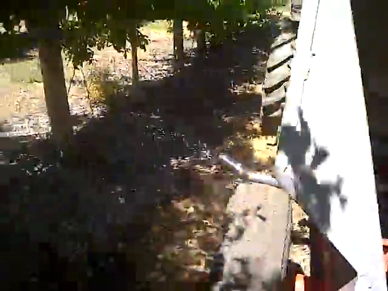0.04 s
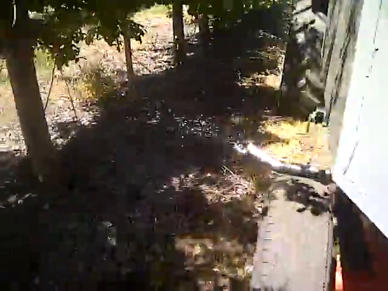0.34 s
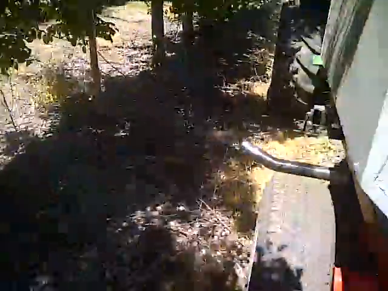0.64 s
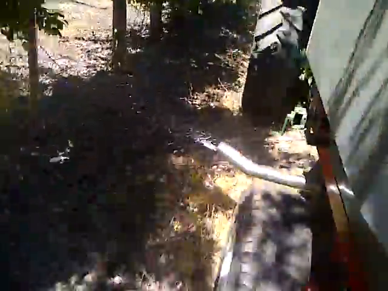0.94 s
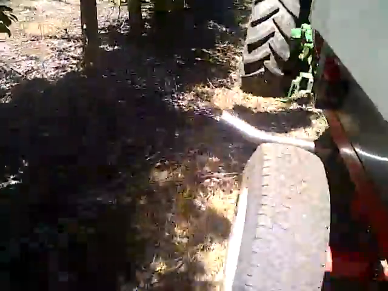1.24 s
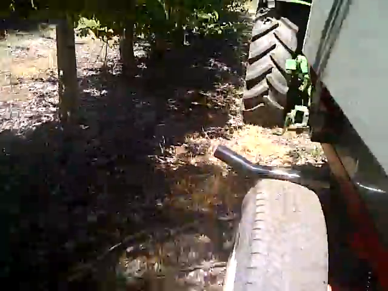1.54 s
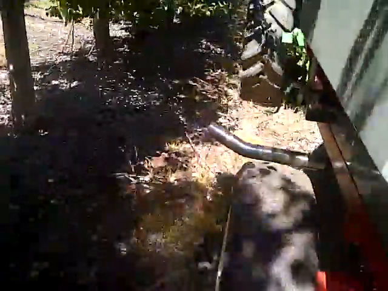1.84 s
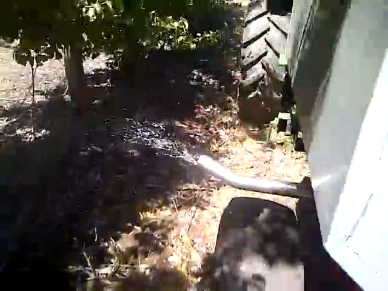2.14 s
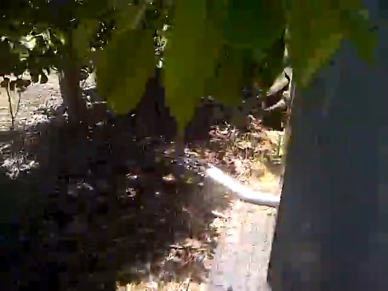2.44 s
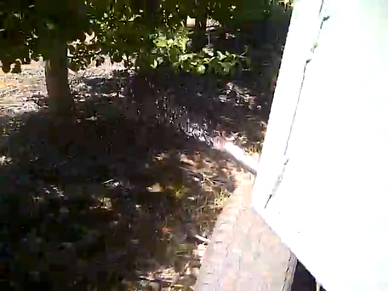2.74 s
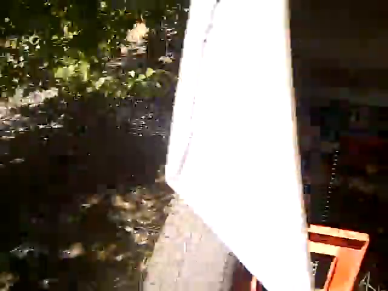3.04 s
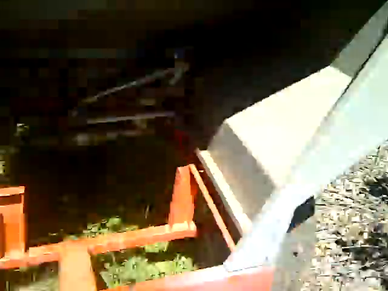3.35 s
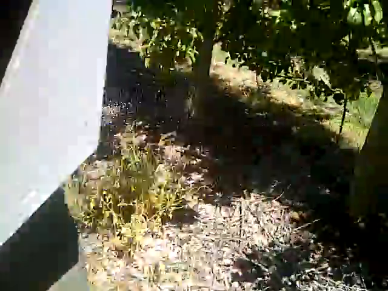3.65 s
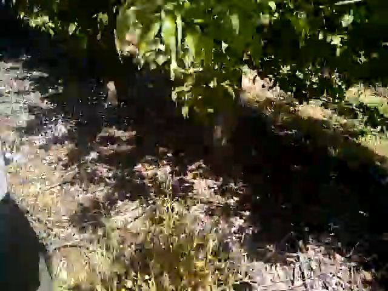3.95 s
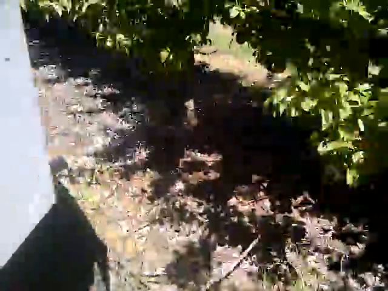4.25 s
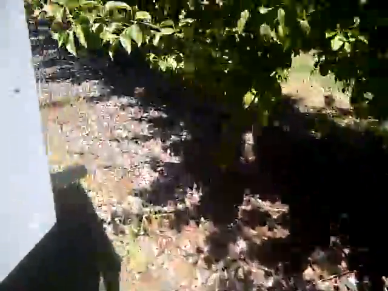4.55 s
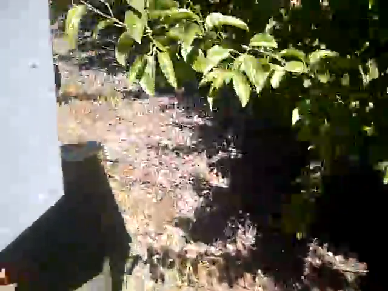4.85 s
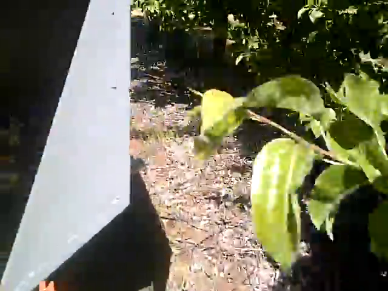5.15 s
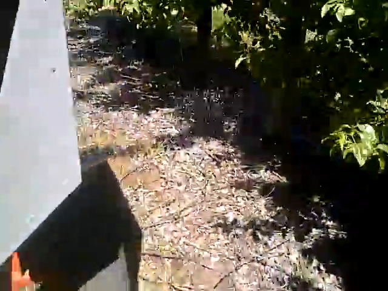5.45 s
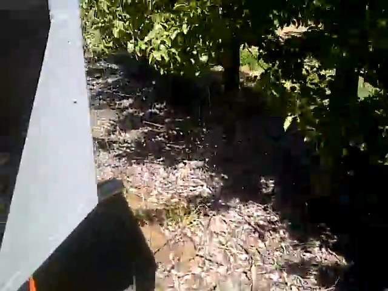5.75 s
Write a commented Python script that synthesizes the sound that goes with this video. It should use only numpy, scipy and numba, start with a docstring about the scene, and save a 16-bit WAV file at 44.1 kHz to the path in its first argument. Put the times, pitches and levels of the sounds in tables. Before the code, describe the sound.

A spreader's blower roars steadily from the start, close and outdoors, with a wavering fan hum and a lower, quieter tractor engine drone. Over it, fertilizer granules hiss through a metal pipe in fast pulses, with irregular heavier rattles and bright clinks from hard lumps, notably around 0.3, 1, 1.5 and 2.4 seconds. The hopper gives a brief dull knock at about 1.2 seconds. At 2.6 seconds a leaf brushes and slaps the microphone with a loud, short crackle, and the whole sound suddenly drops very low. It stays down until about 3 seconds, then creeps back to full level by roughly 4.5 seconds, the rattling continuing throughout. Another knock comes near 4.7 seconds. Short booming gusts sound in the air duct around 4.6, 4.8 and 5.5 seconds, and the hum grows slightly stronger as the machine runs on to 6 seconds.

```python
"""A blower roars and fertilizer granules hiss through a metal pipe, heard from a spreader in an orchard.
Underneath, the tractor engine drones, the fan hums, gusts boom in the duct and jolts knock the hopper.
Each turn of the feed shaft throws a batch of granules that rattles the pipe. Some batches are much
heavier, and hard lumps make the pipe clink. A leaf brushes and then slaps the microphone, so the
automatic volume control turns everything down, waits, then creeps back up."""
import sys
import numpy as np
from scipy import signal
from scipy.fft import rfft, irfft, next_fast_len
from scipy.io import wavfile
from scipy.ndimage import map_coordinates
from numba import njit

SR = 44100
rng = np.random.default_rng(int(sys.argv[2]) if len(sys.argv) > 2 else 0)


def persist_wave(psi):
    """Save psi, clipped to +-1, as 16-bit WAV."""
    counts = np.round(np.clip(psi, -1, 1) * 32767).astype(np.int16)
    wavfile.write(sys.argv[1], SR, np.atleast_2d(counts).T)


N = 265041
TIME = np.arange(N) / SR

# where the microphone is held: t/s, side (0 = left of the hopper, 1 = right)
MIC_SIDE = [(0, 0.25), (3.05, 0.092), (3.55, 1), (6, 0.88)]
# tones in the engine's drone: multiple of the cycle rate, relative level/dB
ENGINE_TONES = [(6, -23.5), (7, -22), (9, -17.5), (12, -15.5), (13, -9.5), (16, -6.5), (17, -10), (18, -7),
                (19, -9.5), (20, -5), (21, -17.5), (25, -13.5), (30, -8.5)]
# how strong the fan's hum is: t/s, level/dB
HUM_LEVEL = [(0, -29.5), (0.4, -26.5), (0.75, -27), (1, -35), (2.4, -28.5), (3.6, -32), (4.2, -31),
             (4.55, -24.5), (4.76, -21.5), (5.02, -28.5), (5.28, -26.5), (5.42, -27.5), (5.56, -24),
             (5.68, -27), (5.77, -20), (5.86, -33.5), (6, -21.5)]
# the blower's roar from bass to treble: f/Hz, relative level/dB
ROAR_SPECTRUM = [(30, -31.5), (105, -31.5), (150, -18.5), (195, -4.5), (240, -8.5), (290, -1), (420, -4.5),
                 (490, -1), (680, -2.5), (870, -7), (1300, -8.5), (2000, -13), (3000, -20.5), (7500, -27.5)]
# the roar swells a little, and dips as the microphone passes behind the hopper: t/s, level/dB
BLOWER_LEVEL = [(0, -22.5), (2.5, -22.5), (3.2, -24.5), (3.55, -23), (3.9, -24.5), (4.3, -22.5),
                (4.7, -21.5), (5.2, -22), (5.52, -20.5), (5.8, -23.5), (6, -22)]
# pitches at which the air duct rings: f/Hz, width/Hz, relative level/dB, change on the right/dB
DUCT_RINGS = [(205.6, 30.5, -17, -1), (545, 59, -23.5, 9.5), (647, 40, -17, 2), (769, 37, -15, -12),
              (1224, 41, -19, 1), (7005, 120, -23, 3.5)]
# gusts of air in the duct: t/s, level/dB, half length/s, f/Hz
DUCT_GUSTS = [(4.553, -23.5, .035, 653), (4.81, -22.5, 0.02, 535), (5.538, -24, 0.035, 630)]
# dull knocks of the hopper, the bin that holds the granules: t/s, level/dB
HOPPER_KNOCKS = [(1.239, -18.5), (1.256, -22), (4.716, -20)]
# pitches at which the hopper's wall rings: f/Hz, width/Hz, relative level/dB
HOPPER_RINGS = [(1040, 90, -12), (1145, 61, -5), (1270, 70, -10), (1360, 86, -8), (1770, 260, -10.5)]
# leaf slaps: t/s, level/dB, contact time/s, crackle against the slap/dB, crackle fade time/s
LEAF_SLAPS = [(2.5968, 11, 0.00011, -1, 0.0018), (2.6025, 17, 0.00017, -45, 0.0018),
              (2.6056, 11, 0.00039, -20, 0.003), (2.6094, 18, 0.00028, -13, 0.00083),
              (2.6164, -4.5, 0.00037, 10, 0.003), (2.626, -4, 0.00052, -4, 0.0096)]
# pitches at which the metal pipe rings: f/Hz, width/Hz, relative level/dB, change on the right/dB
PIPE_RINGS = [(1176, 81, -8, 5.5), (1800, 84, -16.5, -3.5), (2053, 51, -10.5, -2.5), (2876, 36, -11.5, -7),
              (3090, 65, -6, 3), (3363, 89, -7, -1), (3820, 33, -3, -20), (4010, 60, -9, -7),
              (4360, 110, -2, -7.5), (4690, 150, -6, -11), (4980, 89, -1.5, -10), (5170, 120, -3.5, -9.5),
              (5380, 140, -10, -7.5), (5690, 130, -5.5, -7), (5900, 100, -18.5, 8.5),
              (7100, 180, -12.5, 5.5), (7630, 480, 4, 3.5)]
# the ticks of granules from bass to treble: f/Hz, relative level/dB
TICK_SPECTRUM = [(400, -37), (900, -2), (1900, 5), (2450, 2), (3300, 2), (4400, 1), (5200, 0), (6400, 0),
                 (7000, -2.5), (7600, -6)]
# flow of granules through the pipe: t/s, level/dB
FLOW_LEVEL = [(0, -23), (0.2, -26), (0.33, -26.5), (0.44, -28.5), (0.52, -25), (0.9, -27.5), (1.09, -26),
              (1.3, -25.5), (1.55, -25), (1.66, -25.5), (1.78, -24.5), (1.84, -29), (1.95, -24.5),
              (2.5, -26), (3.25, -28), (3.45, -26.5), (3.8, -32), (4.56, -28), (4.8, -30), (5.2, -28),
              (5.7, -28), (6, -26.5)]
# hard lumps hitting the pipe: t/s, level/dB, f/Hz around which the pipe rings most
LUMP_HITS = [(0.3434, -13.5, 4350), (0.352, -18, 3850), (0.7535, -33, 3150), (0.796, -23, 3100),
             (0.947, -21, 3850), (0.991, -24, 3500), (1.049, -27, 4000), (1.467, -21, 4300),
             (1.495, -24, 4900), (1.538, -22, 3900), (1.546, -19, 5000), (1.948, -30, 3400),
             (2.358, -17, 3850), (2.817, -21, 3150), (3.2255, -13, 3750), (3.339, -16, 1950),
             (3.821, -22, 3100), (4.176, -25, 3060), (4.46, -20, 3100), (4.5, -20, 3100),
             (4.685, -24, 3150)]
# loud rattles: t/s, level/dB, spread in time/s. They are heavy batches of granules, except at
# 2.577 s, where a leaf brushes the microphone just before it slaps
LOUD_RATTLES = [(0.2, -22.5, 0.0071), (0.3436, -16.5, 0.004), (0.713, -19, 0.0075), (0.753, -17, 0.0042),
                (0.792, -18, 0.011), (0.942, -18, 0.0046), (0.986, -20.5, 0.011), (1.044, -19.5, 0.0063),
                (1.12, -26.5, 0.013), (1.165, -21.5, 0.0094), (1.21, -25.5, 0.0068), (1.277, -20.5, 0.0053),
                (1.32, -25, 0.0052), (1.405, -25, 0.034), (1.465, -18.5, 0.0049), (1.488, -19.5, .009),
                (1.536, -15.5, 0.0063), (1.776, -22.5, 0.0075), (1.801, -18, 0.0035), (1.917, -21, .016),
                (1.945, -18, 0.01), (2.22, -22, 0.011), (2.3, -21.5, 0.0059), (2.356, -13, 0.0077),
                (2.461, -22, 0.012), (2.577, -22.5, 0.007), (2.758, -22, 0.0041), (2.814, -21, .007),
                (3.169, -18.5, 0.0099), (3.204, -20, 0.0037), (3.224, -16.5, 0.0086),
                (3.267, -20.5, 0.0057), (3.305, -21.5, 0.011), (3.336, -15, 0.0066), (3.399, -21, 0.0029),
                (3.676, -24.5, 0.0036), (3.717, -28, 0.0065), (3.764, -23.5, 0.0075), (3.817, -22, 0.0057),
                (3.86, -23.5, 0.0062), (3.893, -22, 0.0066), (3.956, -20, 0.0069), (4.044, -21, 0.012),
                (4.093, -21, 0.013), (4.173, -22.5, 0.016), (4.363, -29, 0.0032), (4.458, -20, 0.012),
                (4.496, -21.5, 0.042), (4.681, -18.5, 0.0077), (4.858, -28.5, 0.018),
                (4.997, -21.5, 0.0097), (5.086, -26.5, 0.011), (5.182, -25, 0.0065), (5.22, -22, .005),
                (5.454, -22.5, 0.027), (5.498, -20, 0.017), (5.713, -24, 0.019), (5.977, -21, 0.014)]
# the recorder dulls the sound above 7.5 kHz, with a faint band just above 8 kHz: f/Hz, level/dB
RECORDER_TREBLE = [(30, -1), (7400, 1.5), (7750, -4.5), (8000, -22.5), (8300, -7.5), (8600, -12.5),
                   (9000, -34.5)]

FEED_HZ, FIRST_TURN_S = 21.93, 0.025  # the feed shaft: turns a second, and when it first throws


def undb(db):
    """Turn decibels into a number to multiply by."""
    return 10 ** (np.asarray(db) / 20)


def unit(x):
    """Scale a signal to an average strength (rms) of 1."""
    return x / np.sqrt(np.mean(x ** 2))


def curve(points):
    """Join (time, value) points with straight lines, one value per sample."""
    return np.interp(TIME, *np.transpose(points))


def colour(x, points):
    """Make some pitches louder and others softer, following (f/Hz, level/dB) points."""
    hz, db = np.transpose(points)
    size = next_fast_len(N + 8192)
    f = np.arange(size // 2 + 1) * SR / size
    gain = undb(np.interp(np.log(f + 1), np.log(hz), db))
    return irfft(rfft(x, size) * gain, size)[:N]


def resonate(x, hz, width):
    """Let a signal ring at one pitch; a smaller width rings longer."""
    return signal.lfilter(*signal.iirpeak(hz, hz / width, fs=SR), x)


def noise_band(hz, width):
    """Noise rung twice at the same pitch, so little else is left."""
    return resonate(resonate(rng.standard_normal(N), hz, width), hz, width)


def low_pass(x, hz):
    """Cut away the treble above hz."""
    return signal.sosfilt(signal.ellip(8, .2, 70, hz, fs=SR, output="sos"), x)


def wobble(rate):
    """A smooth random wiggle of strength 1 that changes about rate times a second."""
    knots = rng.standard_normal(4096)
    return unit(map_coordinates(knots, [TIME * rate], order=3, mode="wrap"))


def grains(per_s, spread_db):
    """Many tiny, bright ticks of unequal size, at random moments."""
    hit = rng.random(N) < per_s / SR
    size = undb(spread_db * np.minimum(rng.exponential(size=N), 4)) * rng.choice([-1, 1], N)
    return unit(colour(hit * size, TICK_SPECTRUM))


def engine(cycle_hz=21.86, wander=0.0011, waver_db=2.0):
    """The engine repeats at a nearly steady speed. Gives its drone and a running count of cycles."""
    cycles = np.cumsum(cycle_hz * (1 + wander * wobble(2.93))) / SR
    drone = np.zeros(N)
    for multiple, db in ENGINE_TONES:
        strength = undb(db + waver_db * wobble(7.5))
        drone += strength * np.sin(2 * np.pi * (multiple * cycles + rng.random()))
    return np.sqrt(2) * drone, cycles


def fan(blade_hz=454.8, wander=0.007, waver_db=3.0, tone_db=-4.0, housing_db=3, right_db=-7):
    """Gusty intake air shakes the tone of the blades; the housing booms, more so on the left."""
    phase = np.cumsum(blade_hz * (1 + wander * wobble(32))) / SR
    tone = unit(undb(waver_db * wobble(24)) * np.sin(2 * np.pi * phase))
    boom = unit(noise_band(hz=395, width=100))
    return undb(tone_db) * tone + undb(housing_db + right_db * curve(MIC_SIDE)) * boom


def blower(cycles, roar_db=-1.62, throb=0.061, flutter_db=1.5, gust_db=2.2):
    """Swirling air roars, throbs twice per engine cycle and rings the duct, differently on each side."""
    side = curve(MIC_SIDE)
    air = unit(colour(rng.standard_normal(N), ROAR_SPECTRUM))
    air *= undb(roar_db + flutter_db * np.tanh(wobble(14)))
    air *= 1 + throb * np.cos(4 * np.pi * cycles)
    for hz, width, db, right_db in DUCT_RINGS:
        ring = noise_band(hz, 1.43 * width) * undb(gust_db * wobble(15))
        air += undb(db + right_db * side) * unit(ring)
    return air


def gusts(wander=0.01866):
    """Each gust makes the duct boom briefly at one unsteady pitch."""
    wobbly_time = np.cumsum(1 + wander * wobble(70)) / SR
    booms = np.zeros(N)
    for s, db, half_length, hz in DUCT_GUSTS:
        swell = np.exp(-((TIME - s) / half_length) ** 2)
        booms += undb(db) * swell * np.sin(2 * np.pi * hz * wobbly_time)
    return np.sqrt(2) * booms


def knocks(scrape_s=0.016):
    """A jolt of the trailer scrapes the hopper's thin wall, which rings briefly."""
    push = sum(undb(db) * np.exp(-np.maximum(TIME - s, 0) / scrape_s) * (TIME > s)
               for s, db in HOPPER_KNOCKS)
    scrape = push * rng.standard_normal(N)
    return sum(undb(db) * np.sqrt(SR / (np.pi * width)) * resonate(scrape, hz, width)
               for hz, width, db in HOPPER_RINGS)


def leaf(opening_hz=240, leak=0.046):
    """Each slap pushes and crackles; air in the microphone's opening swings and lets a small thud in."""
    push, crackle = np.zeros(N), np.zeros(N)
    for s, db, contact, crackle_db, fade in LEAF_SLAPS:
        age = np.maximum(TIME - s, 0)
        push += undb(db) * age / contact * np.exp(1 - age / contact)
        crackle += undb(db + crackle_db) * np.exp(-age / fade) * (age > 0)
    swing = signal.sosfilt(signal.butter(4, opening_hz, "high", fs=SR, output="sos"), push)
    return swing + leak * push + crackle * grains(per_s=21000, spread_db=1.0) / 2


def pipe(ticks, scatter_db=3.5):
    """Ticks ring the nearer pipe; they land in different spots, so the mix of pitches keeps shifting."""
    side, ring = curve(MIC_SIDE), np.zeros(N)
    for hz, width, db, right_db in PIPE_RINGS:
        strength = undb(db + right_db * side + scatter_db * np.tanh(wobble(22)))
        ring += np.sqrt(1000 / width) * resonate(ticks * strength, hz, width)
    return ring


def stream(surge_db=3.9, ring_db=-15):
    """Flowing granules hiss in the pipe, with a surge of random size on each turn of the shaft."""
    turns = FEED_HZ * (TIME - FIRST_TURN_S) + 1
    size = np.minimum(rng.exponential(size=256), 2)[turns.astype(int)]
    phase = turns % 1
    shape = np.minimum(phase / 0.1, 1) * np.exp(-phase / 0.98)  # quick rise, slow fall
    ticks = grains(per_s=9000, spread_db=1.7) * unit(undb(surge_db * size * shape))
    return ticks + undb(ring_db) * pipe(ticks)


def clinks(reach_octaves=0.3, scatter_db=3):
    """A hard lump rings the pipe cleanly; where it lands decides which pitches stand out."""
    out, age = np.zeros(N + SR), np.arange(int(SR / 10)) / SR
    hz, width, db, _ = np.transpose(PIPE_RINGS)
    fade = np.exp(-np.pi * np.outer(width, age))
    for s, level_db, centre_hz in LUMP_HITS:
        luck, phase = rng.uniform(-1.32, 1, (2, len(hz)))
        distance = np.log2(hz / centre_hz) / reach_octaves
        share = undb(db + scatter_db * luck) / (1 + distance ** 2) ** 2
        rings = fade * np.sin(2 * np.pi * (np.outer(hz, age) + phase[:, None]))
        out[int(s * SR):][:len(age)] += undb(level_db) * (share / np.linalg.norm(share)) @ rings
    return out[:N]


def small_batches(base_db=-29, right_db=-3, scatter_db=5.5, scatter_s=0.011, spread_s=0.0073):
    """List a small batch per shaft turn, a bit early or late, unless a loud rattle falls close by."""
    turns = np.arange(int(N / SR * FEED_HZ))
    late, size = rng.uniform(-1.6, 1, (len(turns), 2)).T
    times = FIRST_TURN_S + turns / FEED_HZ + scatter_s * late
    levels = base_db + right_db * np.interp(times, TIME, curve(MIC_SIDE)) + scatter_db * size
    loud_times = np.array(LOUD_RATTLES)[:, 0]
    return [(s, db, spread_s) for s, db in zip(times, levels)
            if np.abs(loud_times - s).min() > .5 / FEED_HZ]


def batches(rows, ring_db=-4, rise_s=0.00048, lead_db=-4, lead_s=0.0016, clank_db=5.0, clank_s=0.0012):
    """The first granules of a batch clank on the pipe, most follow at once and the rest trail off."""
    power, strike = np.zeros(N), np.zeros(N)
    for s, db, spread in rows:
        near = slice(max(int(s * SR), 0), int((s + .5) * SR))
        age = np.maximum(TIME[near] - s - rise_s, 0)
        rise = 1 - np.exp(-age / rise_s)
        lead = undb(lead_db) * np.exp(-age / lead_s)
        trail = np.exp(-age / (2.35 * spread))
        power[near] += (undb(db) * rise * np.hypot(lead, trail)) ** 2
        strike[near] += undb(db + clank_db) * np.exp(-age / clank_s) * (age > 0)
    spray = np.sqrt(power) * grains(per_s=9000, spread_db=1.6)
    clank = strike * unit(colour(rng.choice([-1., 1.], N), TICK_SPECTRUM))
    return spray + undb(ring_db) * pipe(spray + clank)


def scene(engine_db=-32):
    """Add up the machine, the fertilizer and the leaf, heard from the spreader in the open air."""
    drone, cycles = engine()
    hum = undb(curve(HUM_LEVEL)) * fan()
    roar = undb(curve(BLOWER_LEVEL)) * blower(cycles)
    machine = undb(engine_db) * drone + hum + roar + gusts() + knocks()
    hiss = undb(curve(FLOW_LEVEL)) * stream()
    rattle = batches(LOUD_RATTLES + small_batches())  # also makes the leaf's brush
    return (machine + hiss + rattle + clinks() + leaf())[None]


@njit
def volume_control(x, ceiling, overload, lowest_gain, hold_s, climb_per_s):
    """After an overload, peaks are pulled down to the ceiling; the volume waits, then climbs back."""
    y, gain, wait = np.empty(len(x)), 1., 0.
    ahead = int(SR / 1000)  # spots the overload a millisecond early
    for i in range(len(x)):
        if abs(x[min(i + ahead, len(x) - 1)]) * gain > overload:
            wait = hold_s
        if wait > 0:
            if abs(x[i]) * gain > ceiling:
                gain, wait = max(ceiling / abs(x[i]), lowest_gain), hold_s
            y[i] = min(max(x[i] * gain, -ceiling), ceiling)
            wait -= 1 / SR
        else:
            gain = min(1., gain + climb_per_s / SR)
            y[i] = x[i] * gain
    return y


def record(dry):
    """The recorder dulls the highest treble; the volume control's sudden grab splashes some in."""
    dulled = low_pass(colour(dry[0], RECORDER_TREBLE), hz=9022)
    held = volume_control(dulled, ceiling=0.72, overload=1.4, lowest_gain=0.096,
                          hold_s=0.38, climb_per_s=0.62)
    return low_pass(held, hz=16000)[None]


dry = scene()
out = record(dry)
persist_wave(out)
```